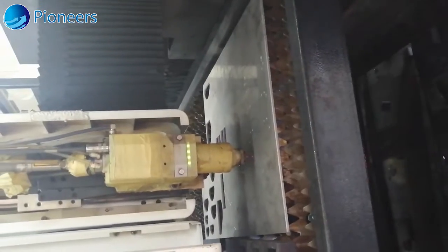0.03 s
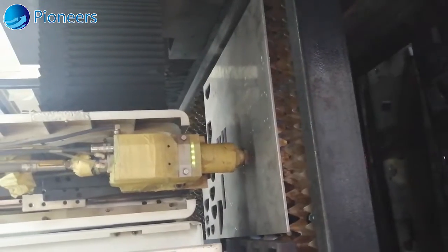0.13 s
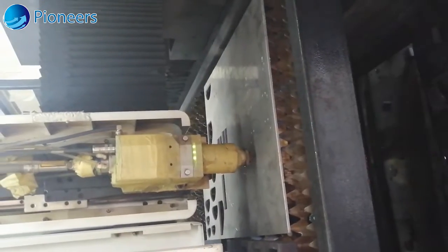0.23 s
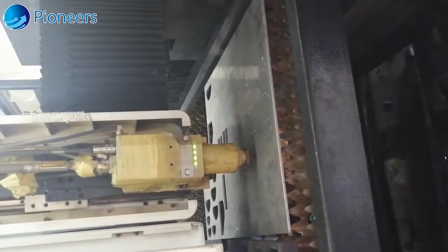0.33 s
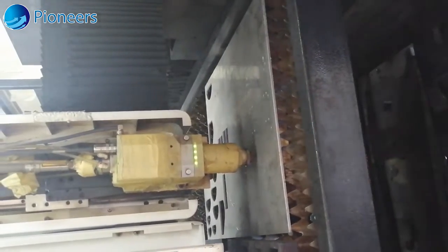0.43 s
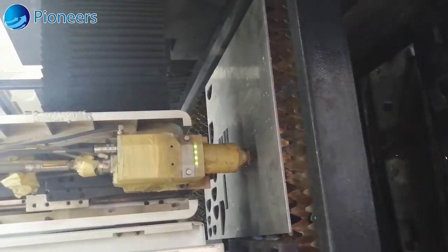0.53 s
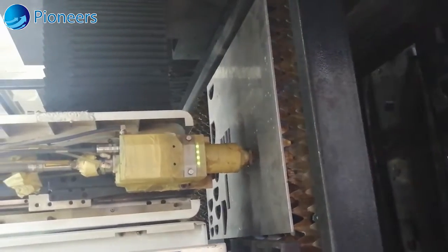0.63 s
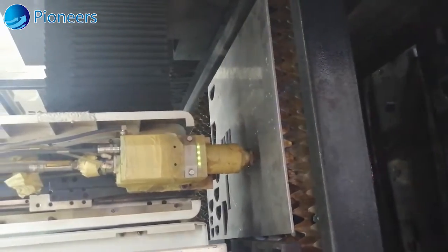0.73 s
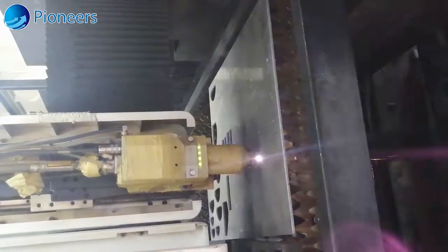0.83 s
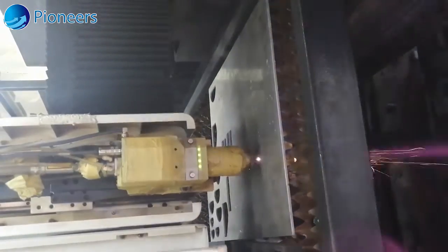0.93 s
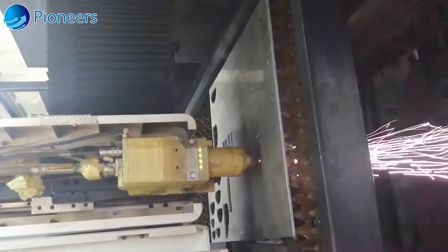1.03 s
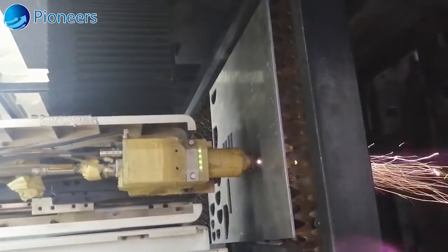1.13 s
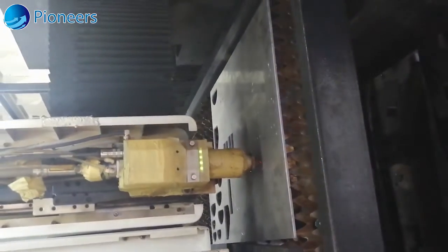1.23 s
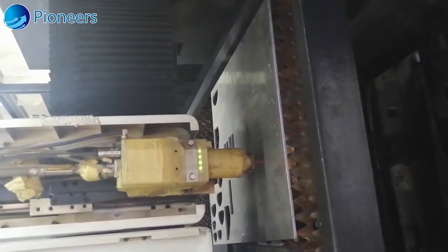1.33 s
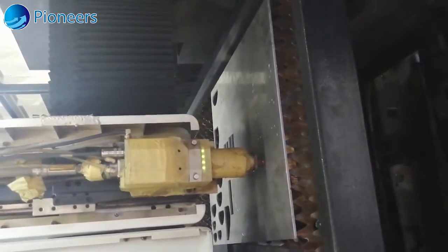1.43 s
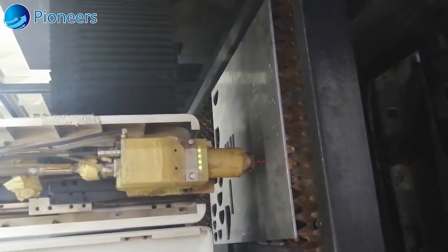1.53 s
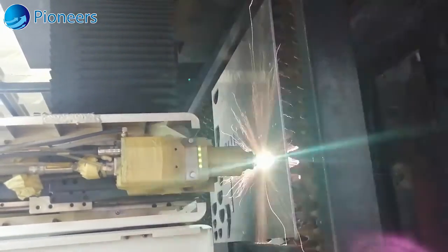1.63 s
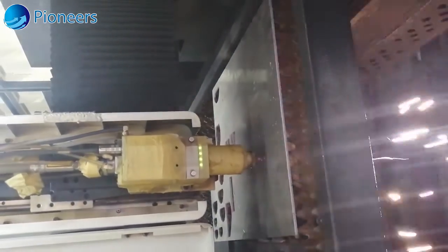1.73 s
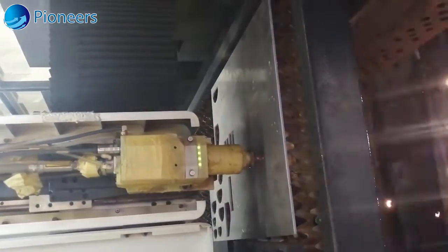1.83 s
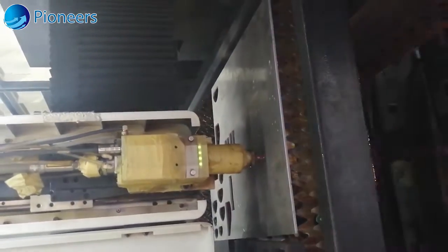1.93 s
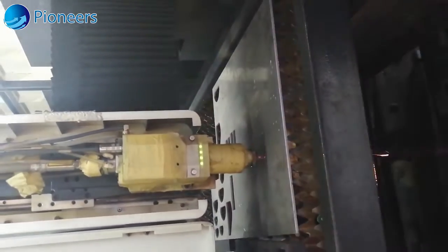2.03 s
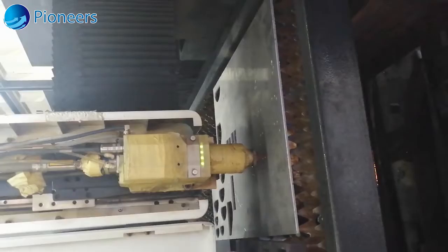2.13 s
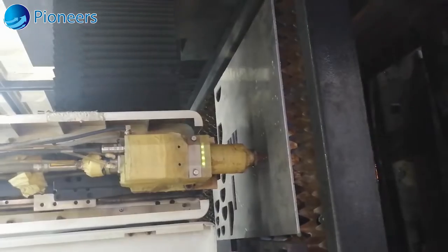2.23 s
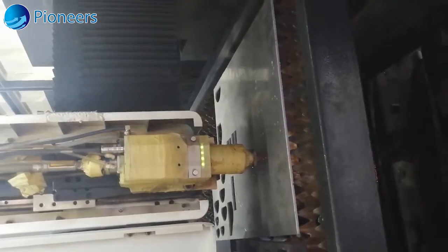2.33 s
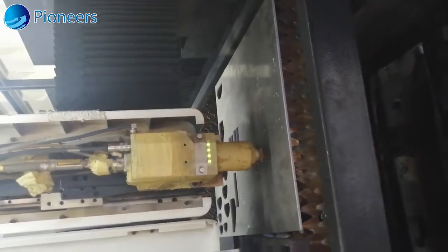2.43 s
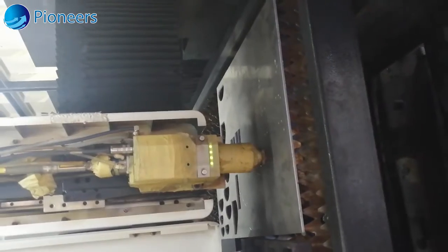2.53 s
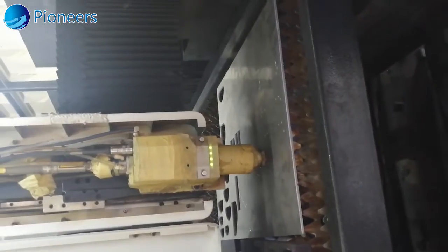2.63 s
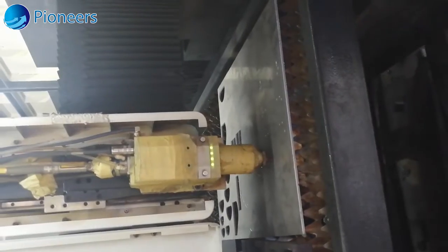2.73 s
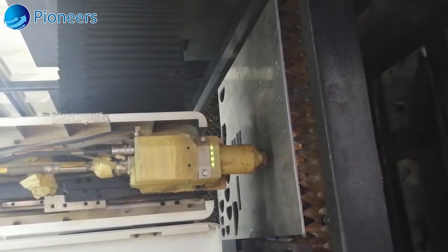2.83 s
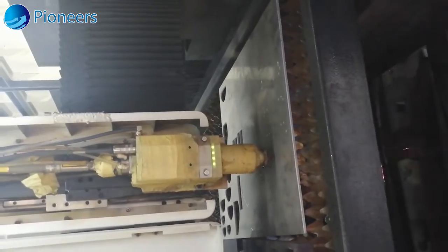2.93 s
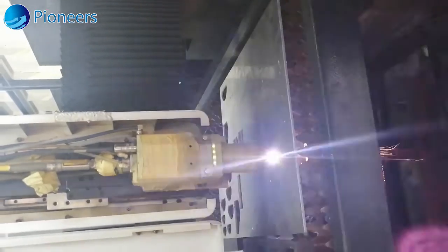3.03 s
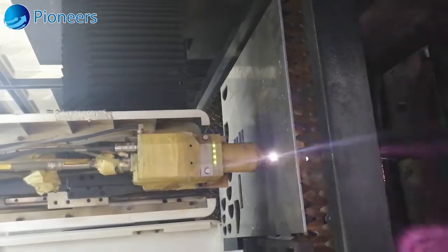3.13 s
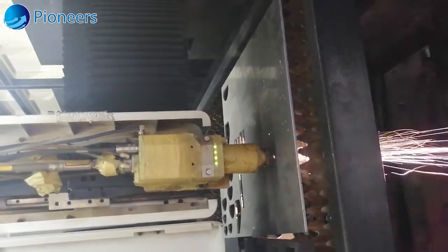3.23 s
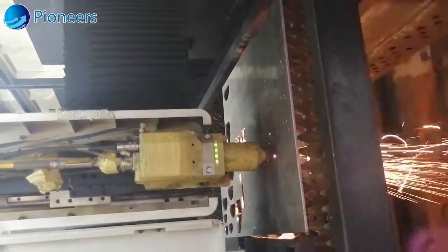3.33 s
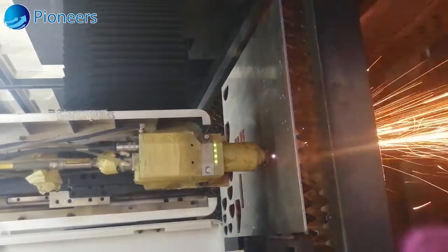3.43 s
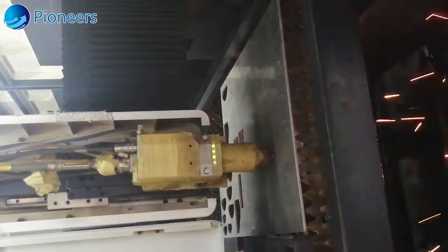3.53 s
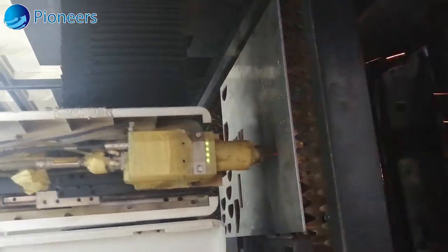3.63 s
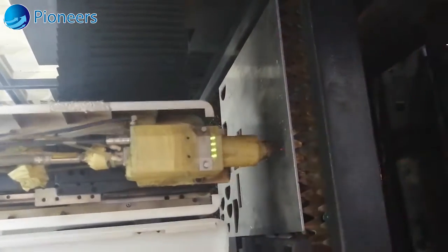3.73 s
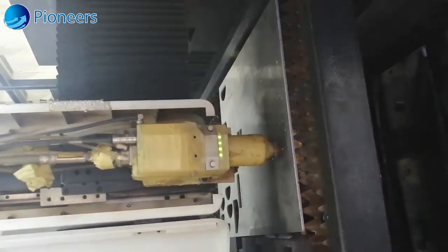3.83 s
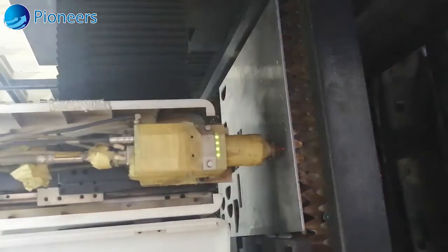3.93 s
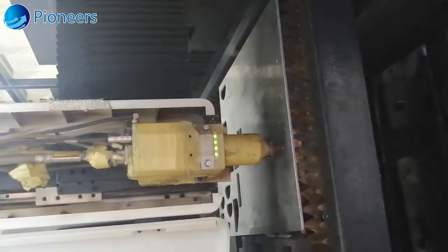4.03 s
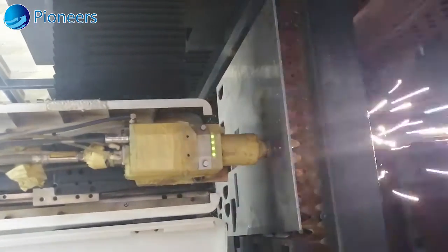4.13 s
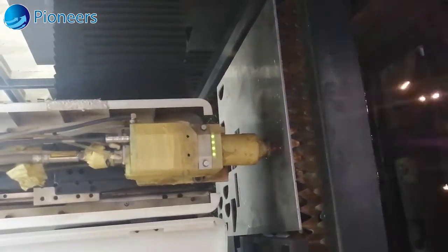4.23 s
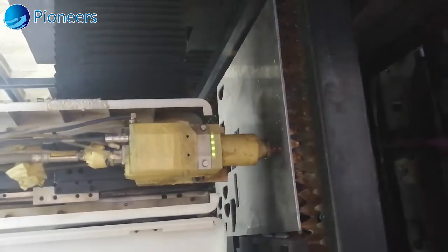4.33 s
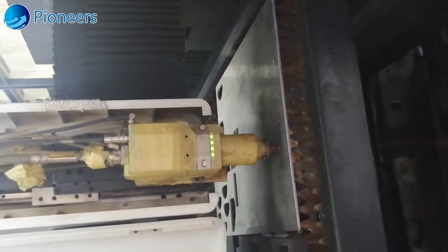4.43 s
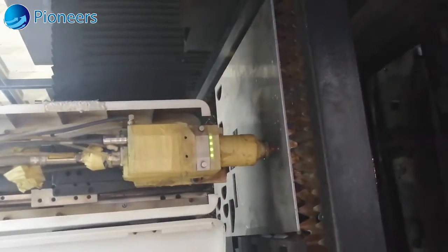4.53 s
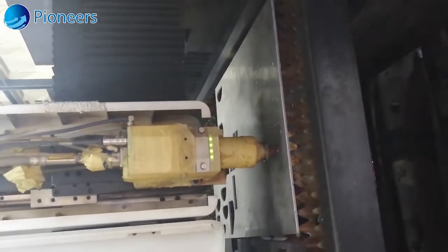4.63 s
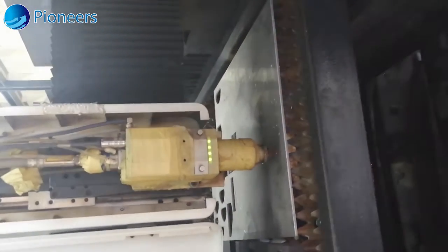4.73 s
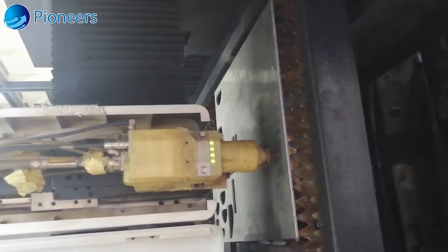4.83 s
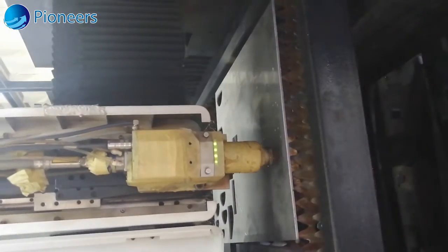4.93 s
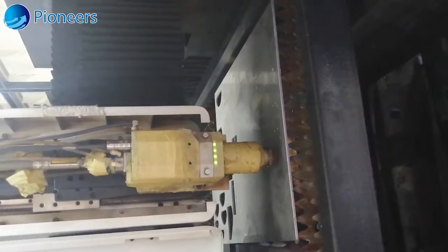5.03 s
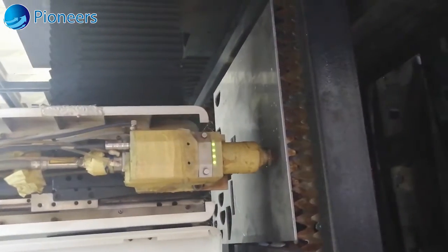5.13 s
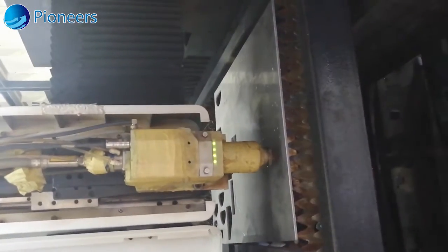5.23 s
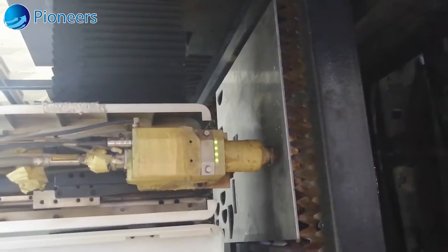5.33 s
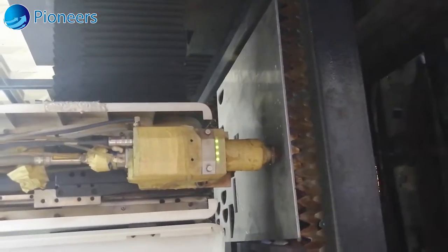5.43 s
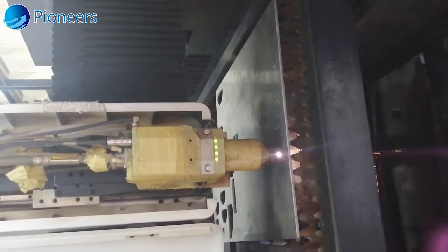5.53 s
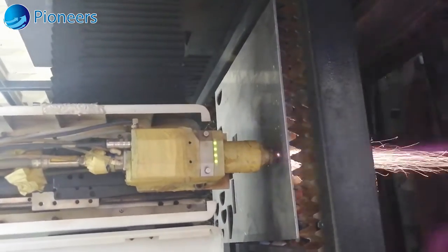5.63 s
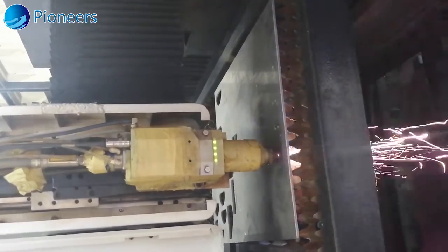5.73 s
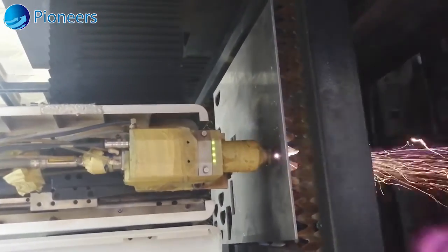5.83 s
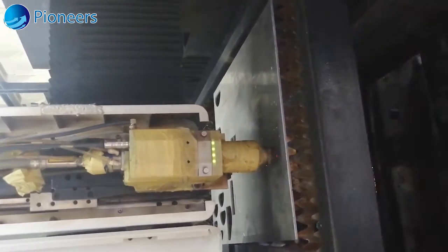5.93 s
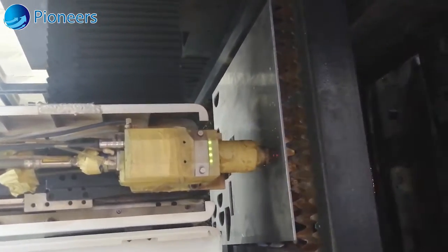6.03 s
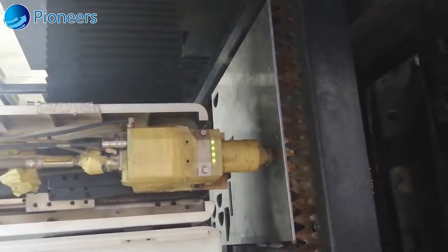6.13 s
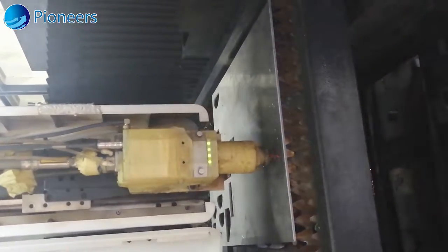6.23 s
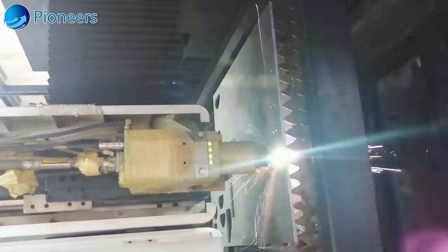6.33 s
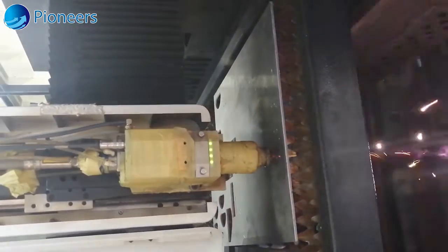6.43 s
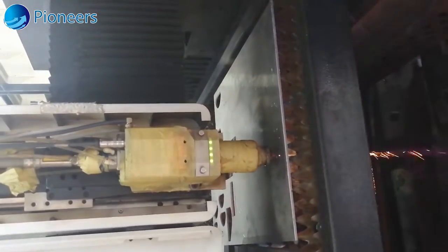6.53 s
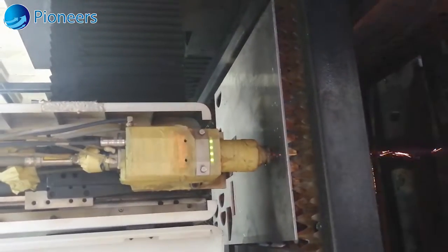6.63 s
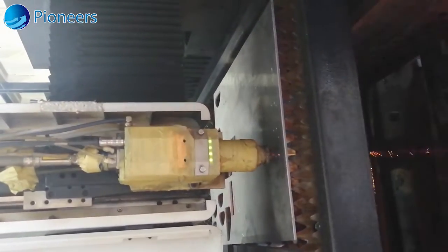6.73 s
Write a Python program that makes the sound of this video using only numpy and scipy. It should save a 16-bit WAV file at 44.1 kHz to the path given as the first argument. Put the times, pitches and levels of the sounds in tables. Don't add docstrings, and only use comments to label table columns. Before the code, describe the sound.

Close metal-cutting machine: high pressurized gas hiss with gritty overload crackle, broken by shrill piercing bursts, pops and violent air blasts over faint fan hum.

```python
import sys
import numpy as np
from scipy import signal
from scipy.fft import rfft, irfft, next_fast_len
from scipy.io import wavfile
from scipy.ndimage import uniform_filter1d

SR = 44100
rng = np.random.default_rng(int(sys.argv[2]) if len(sys.argv) > 2 else 0)


def gain_from_db(level_db):
    decades = np.asarray(level_db, float) / 20
    return 10 ** decades


def wav_out(sig):
    wavfile.write(sys.argv[1], SR, np.round(np.clip(np.atleast_2d(sig).T, -1, 1) * 32767).astype(np.int16))


N = 299439

# hz, level_db (per Hz)
SHOP_COLOUR = [(15, -34), (25, -3), (151, 0), (224, -2.5), (287, -10), (481, -5.5), (616, -16), (1010, -44),
               (1350, -54), (2270, -14), (3500, -26), (4550, -56), (7700, -120)]
SHOP_DB = -64.5
# pitch_hz, level_db (rms)
SHOP_HUMS = [(47, -65.5), (419, -66.5), (1960, -67)]

# start_s, end_s, pitch_hz, level_db
SLOTS = [
    (.95, 1.15, 2950, -54),
    (2.8, 3.4, 2900, -55),
    (5.4, 6.1, 2740, -58),
    (6.298, 6.9, 2526, -46),
]
SLOT_FADE = 87
BED_HZ = 1051
# time_s, far_port_gain_db, hollow_bed_db
HEAD_TRAVEL = [(0, -1, -72), (1, 1, -65), (1.7, 0.5, -64), (3, 2, -53.5), (3.7, -0.5, -58), (4.9, 0, -48.5),
               (5.5, 0.5, -49), (6.15, 2, -56), (6.3, 2.5, -60), (6.79, 2.5, -68)]

CRATER_HZ, CRATER_DB, CRATER_FAR_DB = 5160, 3, -14
# start_s, end_s, pulse_tone_db, second_harmonic_db, third_harmonic_db
BEAM_BURSTS = [
    (.828, 0.888, -39, -36, -38),
    (0.891, 0.968, -37.5, -42, -44),
    (3.086, 3.188, -32.5, -41, -44),
    (3.177, 3.272, -38.5, -52, -47),
    (5.512, 5.588, -32.5, -41.5, -39),
    (5.59, 5.647, -32.5, -45.5, -39),
    (5.872, 5.879, -33, -54, -47),
]
PULSE_HZ = 5000
BEAM_FAR_DB = [-33, 4, -14]
BEAM_SAG = [66, 255, 130]

# time_s, peak_db, width_ms, rebound_share
NEAR_POPS = [(1.342, -29, .3, 0.39), (1.388, -17.5, 0.29, 0.43), (1.626, -24, 0.26, 0.54),
             (2.044, -20, 0.27, .21), (2.204, -17.5, 0.13, .2), (2.247, -26, .3, .27), (2.3, -23, .25, .2),
             (3.092, -19, .45, 0.7), (3.148, -20.5, .36, .97), (3.162, -24, .36, .6),
             (5.996, -21, 0.92, 0.65), (3.64, -29, 0.31, .45), (3.669, -31, .3, .46),
             (3.733, -27.5, 0.27, 0.39), (6.097, -31.5, 0.7, 0.9), (6.303, -25, 0.15, 0.49),
             (6.333, -30, 0.22, .4)]
FAR_POPS = [(.844, -22, 0.42, 0.089), (.853, -27, .46, .4), (.943, -25, .66, .1), (3.098, -24, 0.61, 0.27),
            (3.178, -31, .37, .97), (3.194, -28, 0.29, 1.1), (3.214, -29, 0.73, .7), (3.437, -36, 2.5, .18),
            (3.444, -27, 1.4, .3), (3.453, -31, 1.9, .3), (3.467, -21, 0.63, .3), (3.472, -30, .76, .3),
            (3.486, -29, 2.2, .2), (3.492, -21, 0.67, .62), (3.527, -36, 2.7, .1), (3.545, -22, 1.2, .3),
            (3.559, -35, 1.7, .2), (3.563, -30, 1.1, .9), (3.571, -36, 5.1, .3), (3.579, -22, 2.3, .1),
            (5.609, -32, 1.2, .6), (5.631, -29, 1.3, .4), (1.183, -44, 0.92, .3), (5.873, -47, 0.92, .3),
            (5.995, -27, 1.1, .3)]
NEAR_REBOUND_MS, FAR_REBOUND_MS = 3.3, 4.5
# hz, level_db (per Hz)
CRACKLE_COLOUR = [(20, 11), (300, 0.5), (1000, -2), (2500, -4), (3500, -1.5), (4200, -8.5), (8000, 7.5),
                  (16000, -23)]

# hz, level_db (per Hz)
NEAR_PORT = [(600, -30), (1100, -22), (1450, -26), (2900, -21.5), (3900, -26), (4600, -14), (5200, -2.5),
             (6000, 0), (7900, -14), (9900, -11.5), (10800, -13), (14000, -10), (14900, -3), (15450, -10)]
FAR_PORT = [(400, -22), (1050, -11), (1600, -14), (2700, -11), (4000, -17), (4900, -8), (6000, -8),
            (6800, -3), (8500, 0), (10100, -3), (11500, -7), (13500, -9), (15000, -8), (15500, -24)]

# start_s, end_s, jet_db, top_octave_db, overload_db
WAITS = [(.33, .85, -37, -49, -53.5), (2.62, 3.1, -34.5, -50.5, -54.5), (5.06, 5.53, -37, -48.5, -53)]
PIERCES = [(0.834, 0.97, -35.5, -51.5, -45.5), (3.09, 3.228, -32.5, -47, -43.5),
           (5.52, 5.638, -33.5, -46.5, -45)]
DWELLS = [(.965, 1.18, -38, -51, -55), (3.228, 3.435, -39, -50.5, -53.5), (5.645, 5.87, -36.5, -51.5, -59),
          (1.31, 1.392, -41, -51.5, -51.5), (3.6, 3.74, -56, -48.5, -49.5), (3.74, 3.81, -43.5, -64.5, -71),
          (6.04, 6.095, -40, -50.5, -51.5)]
BLOWS = [(1.18, 1.305, -33, -44, -41.5), (3.442, 3.578, -28.5, -38, -28), (5.873, 6.0, -31.5, -41, -37)]
CUTS = [(-.1, .125, -33, -45.5, -48), (1.512, 2.4, -34.5, -46, -46), (3.945, 4.86, -33, -44.5, -47),
        (6.222, 6.9, -33, -46, -45.5)]
SPURTS = [(.831, .857, -44, -42, -32), (.895, .898, -40, -52, -50), (.915, .957, -37, -42, -30.5),
          (1.216, 1.295, -36.5, -50, -41), (2.035, 2.06, -44, -56, -47), (2.12, 2.4, -64, -60, -45.5),
          (3.086, 3.1, -47, -41, -28.5), (3.1, 3.121, -40, -45, -37), (3.157, 3.168, -38, -42.5, -33),
          (3.178, 3.2, -35, -45, -30), (3.2, 3.222, -35, -46, -33.5), (3.578, 3.595, -31, -46, -36.5),
          (3.928, 3.945, -36, -53, -67), (4.74, 4.85, -40, -58, -52), (5.515, 5.555, -46.5, -47, -29.5),
          (5.595, 5.602, -32, -47, -31.5), (5.61, 5.642, -39, -42.5, -30.5), (5.871, 5.876, -35, -51, -39),
          (5.985, 6.006, -37, -50, -52)]
# three rise_db_per_s and three fall_db_per_s (jet, top octave, overload),
# then far_port_db (over the top octave)
WAIT_SLOPES = [54, 60, 100], [270, 300, 300], 1.9
PIERCE_SLOPES = [1700, 1500, 1500], [82, 260, 240], 0.83
DWELL_SLOPES = [190, 300, 360], [67, 100, 210], 2.8
BLOW_SLOPES = [146, 330, 1600], [75, 250, 1100], 0.57
CUT_SLOPES = [480, 380, 150], [59, 66, 144], 0.55
SPURT_SLOPES = [3300, 1900, 4800], [300, 490, 1940], .1
KERF_LAG_S = 0.068
EDGE_HZ = 15740


def evened(x):
    return x / np.sqrt(np.mean(x ** 2) + 1e-20)


def smoothed(x, ms):
    r = np.exp(-1000 / (ms * SR))
    return signal.lfilter([1 - r], [1, -r], x)


def flutter(length, ms):
    a, b = rng.standard_normal((length, 2)).T
    z = smoothed(smoothed(a + 1j * b, ms), ms)
    return z / np.sqrt(np.mean(abs(z) ** 2))


def held(t, start, end, rise, fall):
    return -rise * np.maximum(start - t, 0) - fall * np.maximum(t - end, 0)


def coloured(x, spectrum):
    size = next_fast_len(N)
    hz, db = np.transpose(spectrum)
    curve_db = np.interp(np.log(np.fft.rfftfreq(size, 1 / SR) + 1), np.log(hz + 1), db)
    return evened(irfft(rfft(x, size) * gain_from_db(curve_db), size)[:N])


def hiss(patchy_db, tilt_db=0.):
    frames, hz = N // 64 + 5, np.fft.rfftfreq(256, 1 / SR)
    a, b, patches = rng.standard_normal((frames, 129, 3)).T
    patches = uniform_filter1d(patches, size=4, axis=0)
    patches = evened(uniform_filter1d(patches, size=30, axis=1))
    tilt_db = np.interp(np.arange(frames) * 64, np.arange(N), tilt_db * np.ones(N))
    top = np.clip((hz[:, None] - 7500) / 2500, 0, 1)
    z = (a + 1j * b) * gain_from_db(patchy_db * patches + top * tilt_db)
    return evened(signal.istft(z, nperseg=256, noverlap=192)[1][:N])


def reflected(x, wet, t60):
    t = np.arange(4096) / SR
    sparse = rng.random(4096) < 1500 / SR
    taps = rng.standard_normal(4096) * sparse * gain_from_db(-60 * t / t60)
    return evened(x + wet * signal.oaconvolve(x, taps / np.linalg.norm(taps))[:N])


def stages():
    t, power = np.arange(0, N + 32, 32) / SR, 1e-20
    kinds = [(WAITS, WAIT_SLOPES, 0), (PIERCES, PIERCE_SLOPES, 0), (DWELLS, DWELL_SLOPES, 0),
             (BLOWS, BLOW_SLOPES, 0), (CUTS, CUT_SLOPES, KERF_LAG_S), (SPURTS, SPURT_SLOPES, 0)]
    for rows, (rise, fall, far_db), overload_lag in kinds:
        for start, end, *db in rows:
            lags = [0, 0, overload_lag]
            near, top, over = [db[k] + held(t, start + lags[k], end, rise[k], fall[k]) for k in range(3)]
            power = power + gain_from_db([near, top, top + far_db, over]) ** 2
    return [np.interp(np.arange(N) / SR, t, db) for db in 10 * np.log10(power)]


def shop():
    t = np.arange(N) / SR
    both = hiss(0.82)
    wash = np.array([coloured(1.85 * both + hiss(5.8), SHOP_COLOUR) for port in range(2)])
    tones = sum(gain_from_db(db - 4.5) * (flutter(N, 21.0) * np.exp(2j * np.pi * hz * t)).real
                for hz, db in SHOP_HUMS)
    return gain_from_db(SHOP_DB + np.array([[1.5], [2.5]])) * wash + tones


def slot(near_db, bed_db):
    t = np.arange(N) / SR
    song = sum(gain_from_db(db + held(t, start, end, SLOT_FADE, SLOT_FADE)) * np.exp(2j * np.pi * hz * t)
               for start, end, hz, db in SLOTS)
    whistle = np.array([(flutter(N, .8) * song).real for port in range(2)])
    boom = (flutter(N, .5) * np.exp(2j * np.pi * BED_HZ * t)).real
    breath_db = 0.43 * (near_db + 28.0) + np.array([[3], [5]])
    return gain_from_db(breath_db) * whistle + gain_from_db(bed_db + breath_db - 3.5) * boom


def crater():
    t = np.arange(N) / SR
    size = sum(gain_from_db(db + CRATER_DB + held(t, start, end - .02, 2500, 250))
               for start, end, db, *rest in PIERCES)
    rasp = (flutter(N, .9) * np.exp(2j * np.pi * CRATER_HZ * t)).real
    return size * rasp * gain_from_db([[CRATER_FAR_DB], [0]])


def beam():
    out = np.zeros((2, N))
    for start, end, *levels in BEAM_BURSTS:
        at = np.arange(round(start * SR), round(end * SR))
        fade = signal.windows.tukey(len(at), .1)
        for k, db in enumerate(levels):
            shake = np.array([1 + .45 * flutter(len(at), 4) + .75 * flutter(len(at), .45)
                              for port in range(2)])
            wave = (shake * np.exp(2j * np.pi * (k + 1) * PULSE_HZ * at / SR)).real
            wave = wave * gain_from_db(db + 11 - BEAM_SAG[k] * (at / SR - start)) * fade
            out[:, at] += wave * gain_from_db([[BEAM_FAR_DB[k]], [0]])
    return out


def pops(rows, rebound_ms):
    out, ms = np.zeros(N), np.arange(2048) * 1000 / SR
    for s, db, width, share in rows:
        early, late = np.minimum(ms - .3, 0), np.maximum(ms - .3, 0)
        spike = np.exp(-(early / .13) ** 2 / 2 - (late / width) ** 2)
        dip = share * (1 - np.exp(-(late / width) ** 2)) * np.exp(-late / rebound_ms)
        at = round(s * SR) - 13
        out[at:at + 2048] += gain_from_db(db) * (spike - dip)
    return out


def crackle(overload_db):
    sides = signal.sosfilt(signal.butter(2, 3000, fs=SR, output="sos"), rng.standard_normal((N, 2)).T)
    envelope = evened(np.hypot(*sides))
    headroom = np.clip(1.2 - .07 * (overload_db + 48), .3, 1.4)
    steps = np.linspace(.2, 1.5, num=14)
    excess = np.maximum(envelope[:SR, None] - steps, 0)
    spikes = np.maximum(envelope - headroom, 0) - np.interp(headroom, steps, excess.mean(0))
    spikes = spikes / np.interp(headroom, steps, excess.std(0))
    both_ways = np.clip((overload_db + 45) / 9, 0, .95)
    spikes = np.sqrt(1 - both_ways ** 2) * spikes + both_ways * evened(sides[0])
    spikes = coloured(spikes - 0.95 * smoothed(spikes, 1.2), CRACKLE_COLOUR)
    size = gain_from_db(overload_db + 6 - 3 * np.maximum(-52 - overload_db, 0))
    size = size * gain_from_db(2.5 * both_ways * np.sqrt(2) * flutter(N, 1.5).real)
    size = size * gain_from_db(3 * both_ways * flutter(N, 5).real + 2.5 * (1 - both_ways) * flutter(N, 8).real)
    wobble = evened(smoothed(smoothed(rng.standard_normal(N), 2), 2))
    sag = smoothed(0.089 * np.tanh(size / 0.14) * (0.5 + 0.43 * wobble), 1.8)
    return size * spikes - sag + 1.2 * smoothed(sag, 24)


def jet(near_db, top_db, far_db):
    tilt_db = top_db - near_db
    near = hiss(0.97, tilt_db - tilt_db.mean())
    far = reflected(.25 * near + hiss(1.2), wet=.35, t60=.15)
    near = reflected(near, wet=.3, t60=.15)
    return np.array([gain_from_db(far_db + 9.0) * coloured(far, FAR_PORT),
                     gain_from_db(near_db + 8.0) * coloured(near, NEAR_PORT)])


def scene():
    near_db, top_db, far_db, overload_db = stages()
    s, far_gain_db, bed_db = np.transpose(HEAD_TRAVEL)
    t = np.arange(N) / SR
    far_gain_db, bed_db = np.interp(t, s, far_gain_db), np.interp(t, s, bed_db)
    far_overload = pops(FAR_POPS, FAR_REBOUND_MS)
    near_overload = crackle(overload_db) + pops(NEAR_POPS, NEAR_REBOUND_MS)
    background = shop() + slot(near_db, bed_db)
    head = crater() + beam() + jet(near_db, top_db, far_db + far_gain_db)
    return background + head + np.array([far_overload, near_overload])


def roll_off(x):
    return signal.sosfilt(signal.butter(12, 16000, fs=SR, output="sos"), x)


def record(dry):
    ceiling = 0.34
    edge = signal.firwin(1023, EDGE_HZ, window=("kaiser", 9), fs=SR)
    limited = signal.oaconvolve(ceiling * np.tanh(dry / ceiling), edge[None], "same")
    return roll_off(limited)


dry = scene()
out = record(dry)
wav_out(out)
```